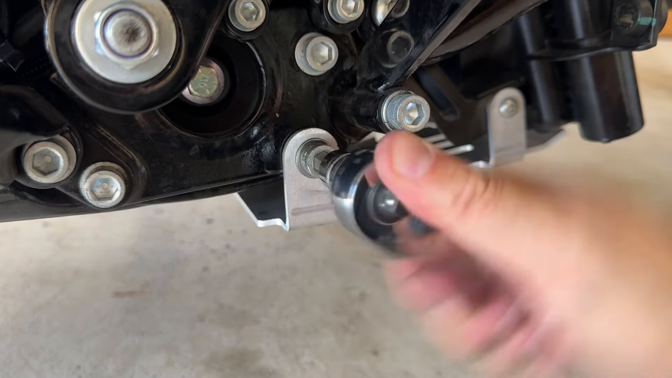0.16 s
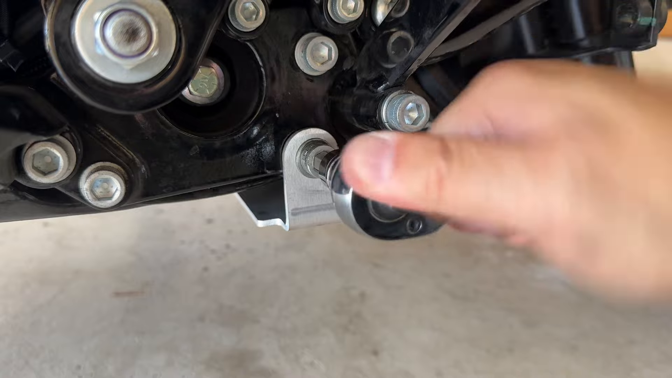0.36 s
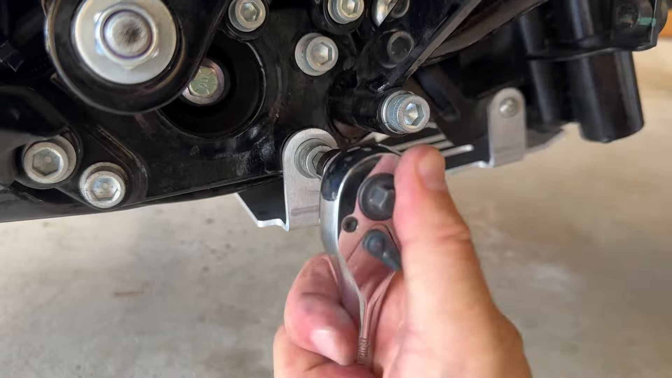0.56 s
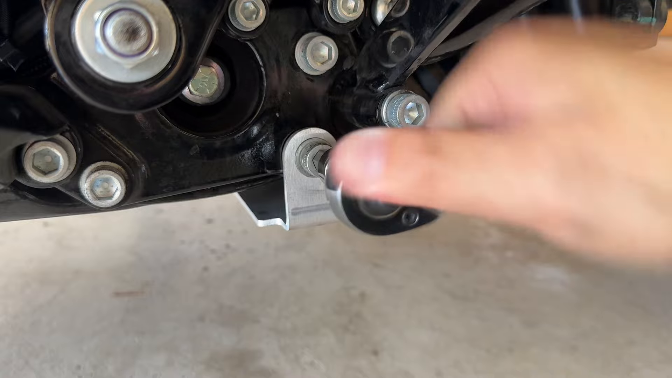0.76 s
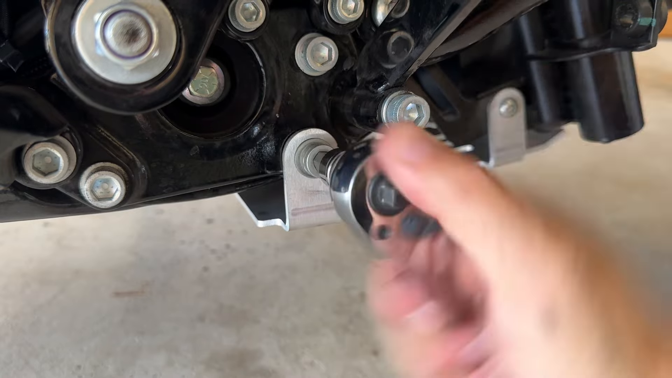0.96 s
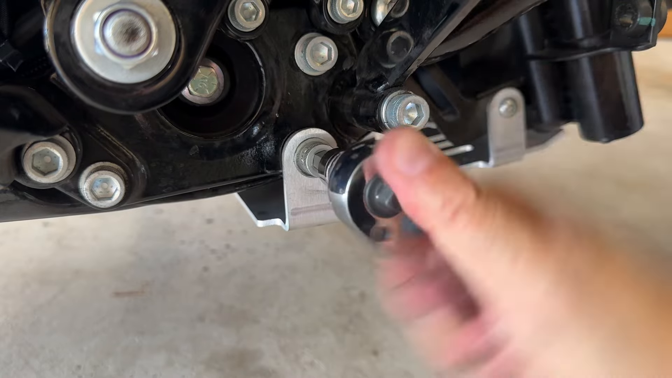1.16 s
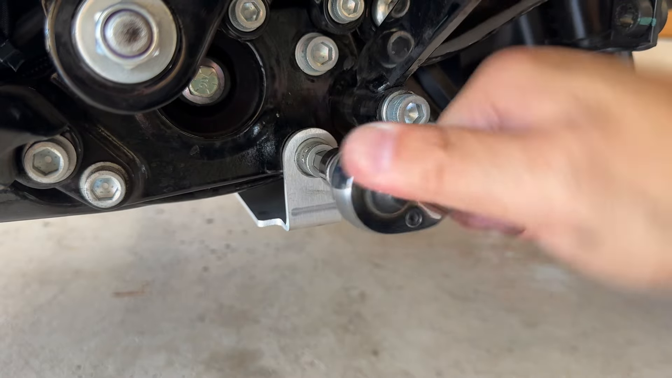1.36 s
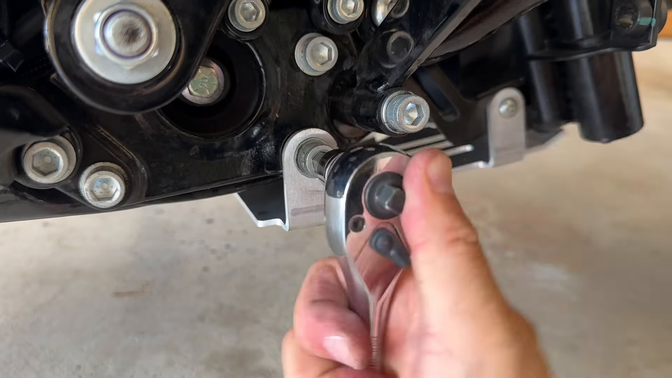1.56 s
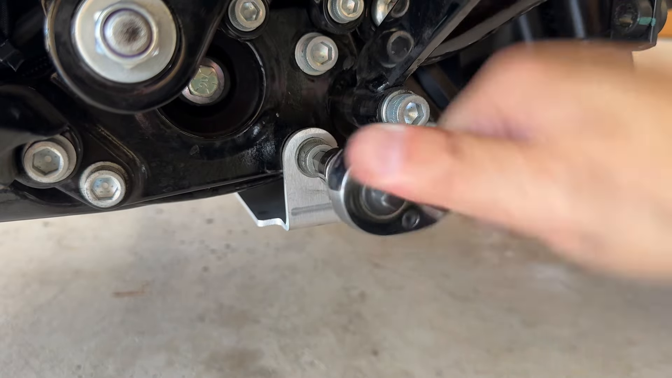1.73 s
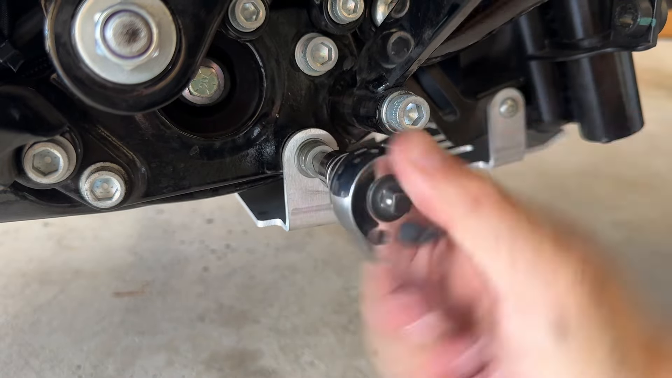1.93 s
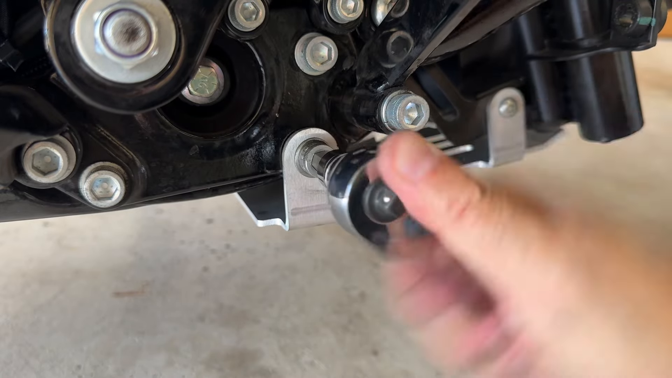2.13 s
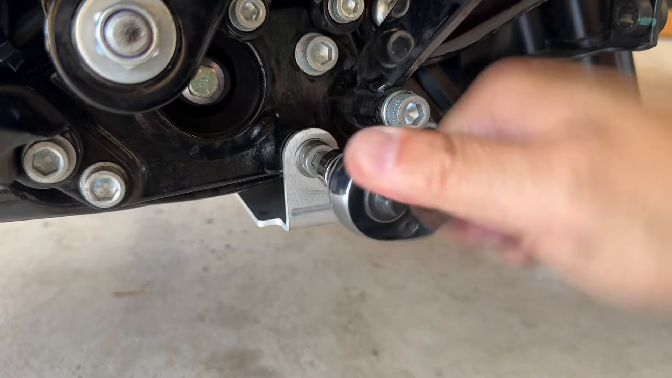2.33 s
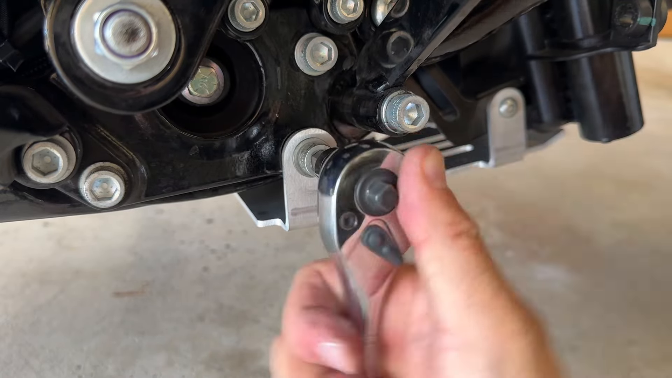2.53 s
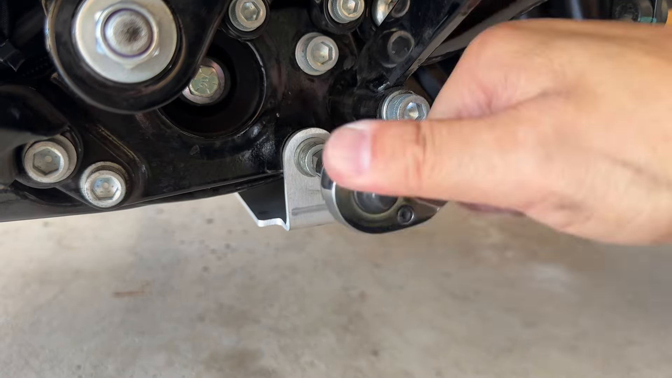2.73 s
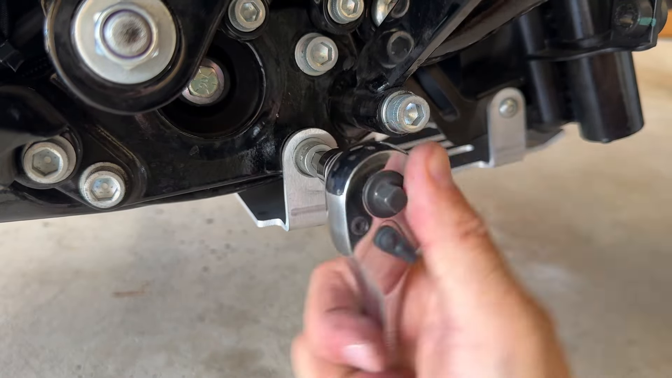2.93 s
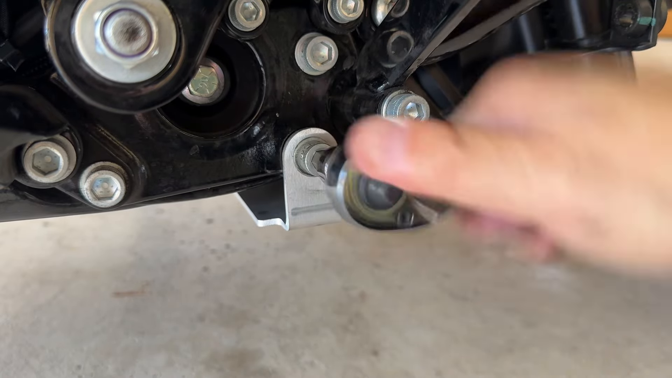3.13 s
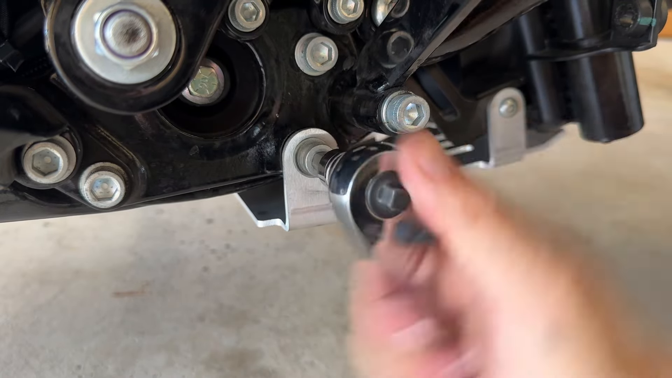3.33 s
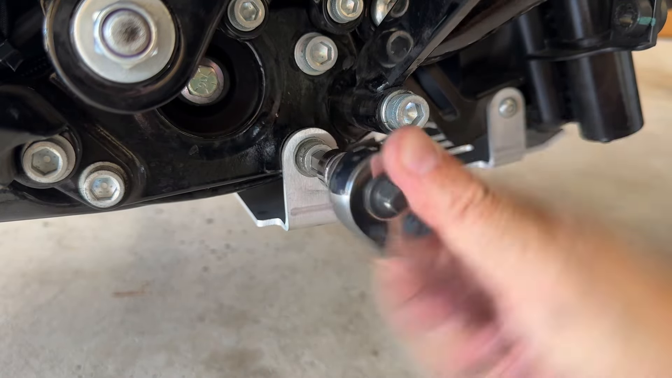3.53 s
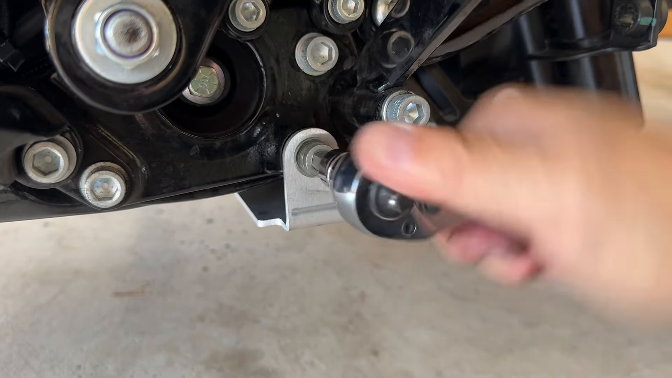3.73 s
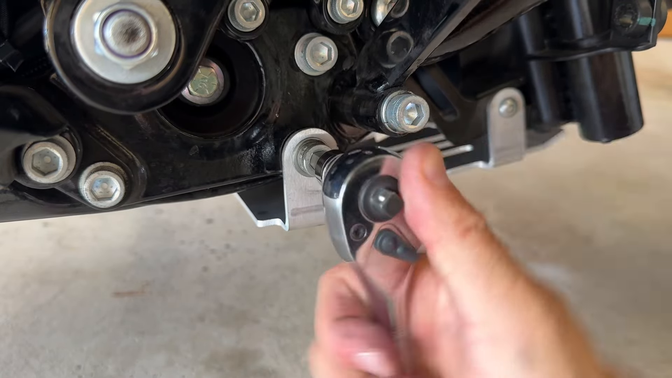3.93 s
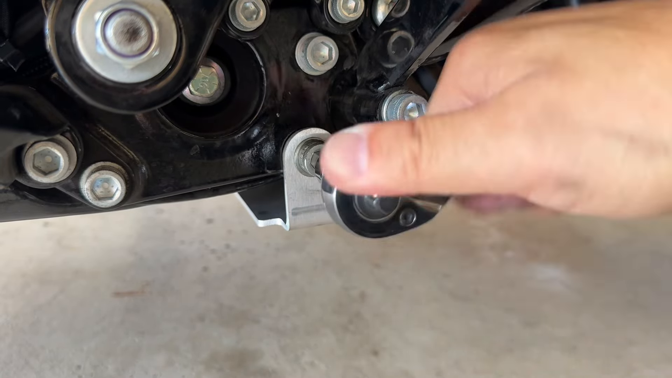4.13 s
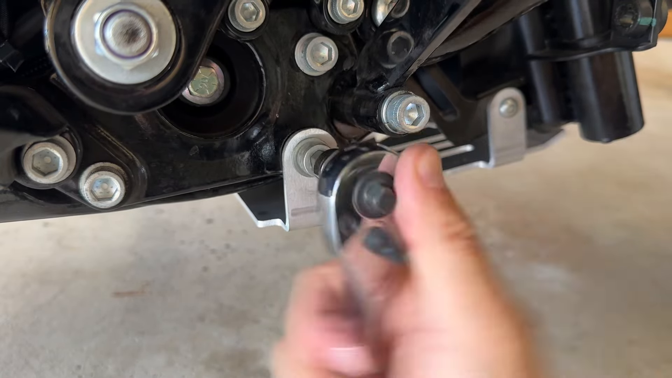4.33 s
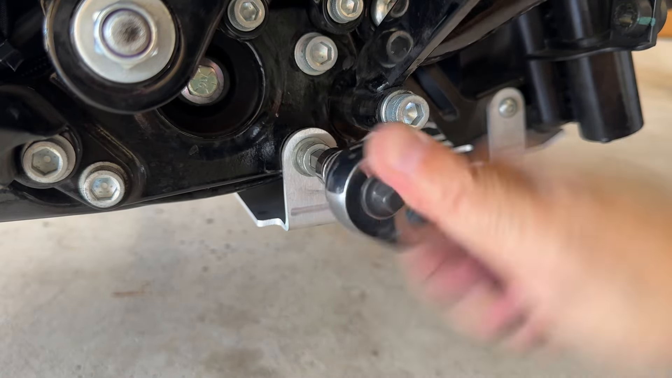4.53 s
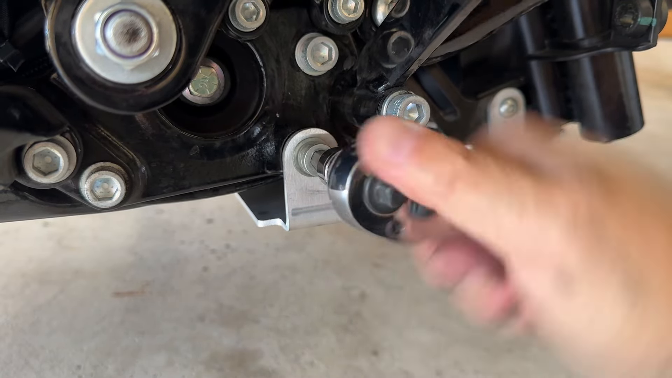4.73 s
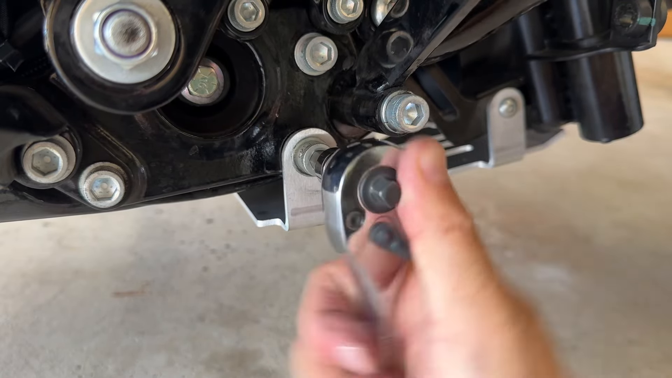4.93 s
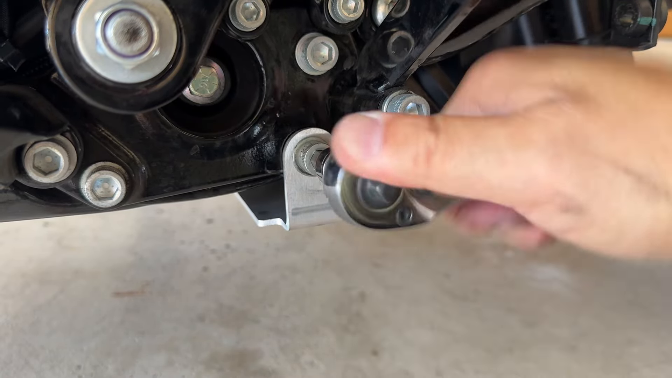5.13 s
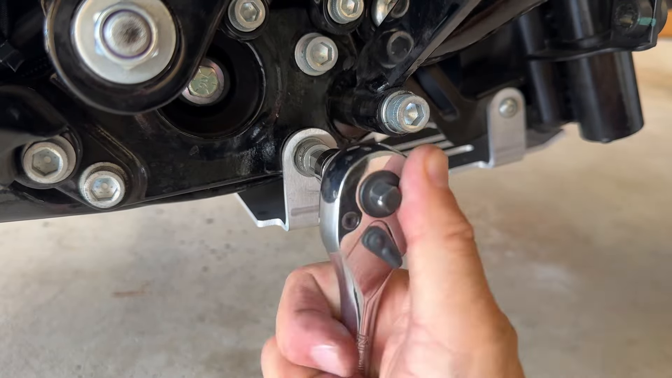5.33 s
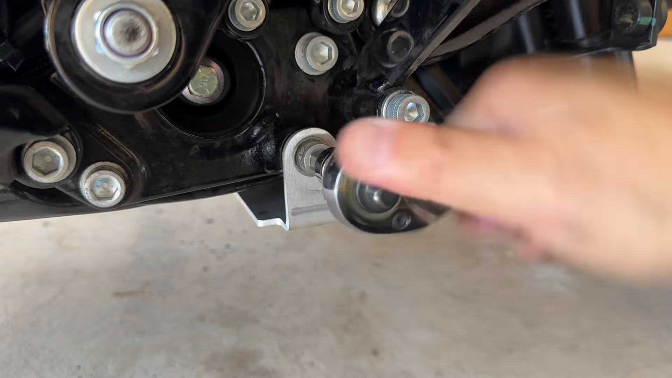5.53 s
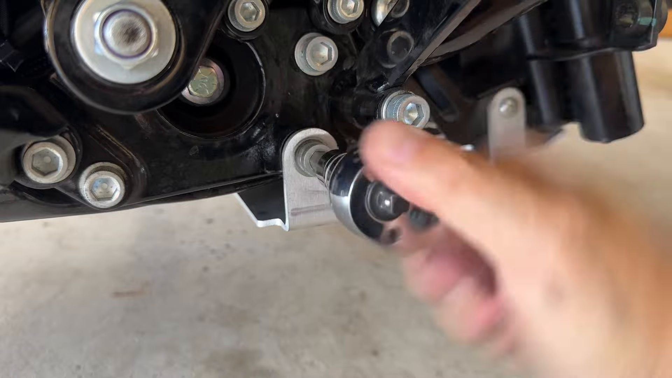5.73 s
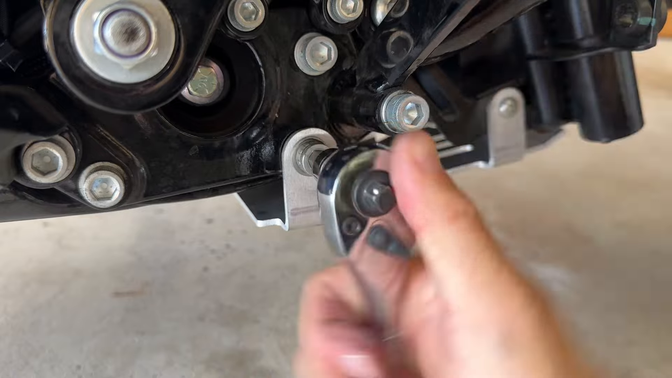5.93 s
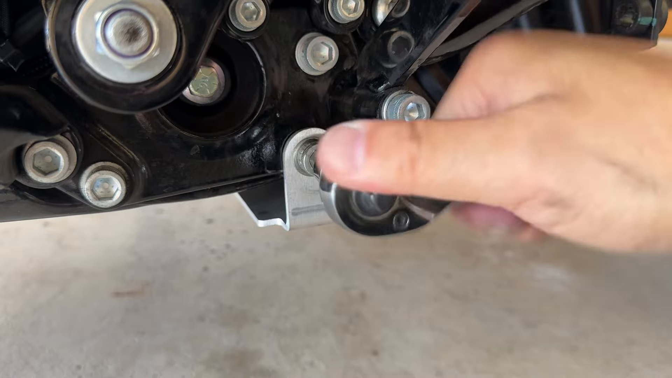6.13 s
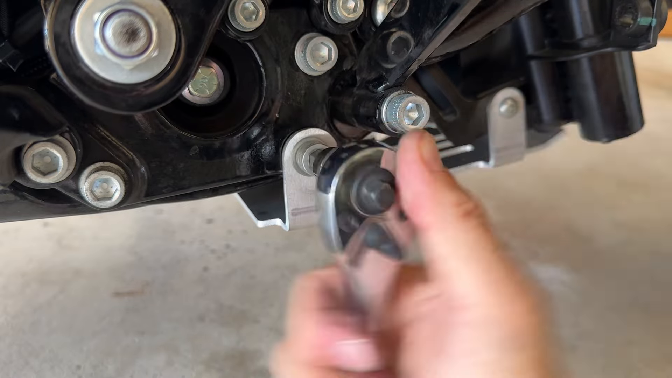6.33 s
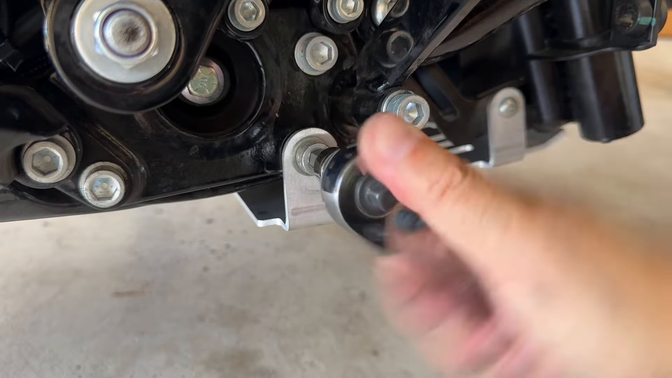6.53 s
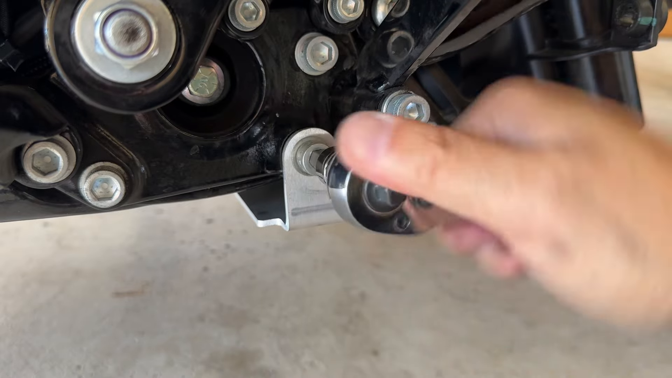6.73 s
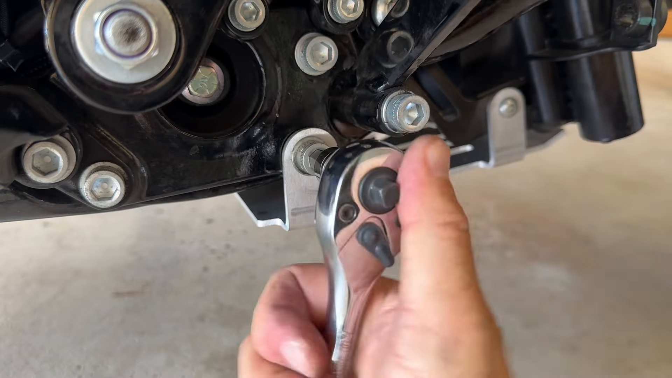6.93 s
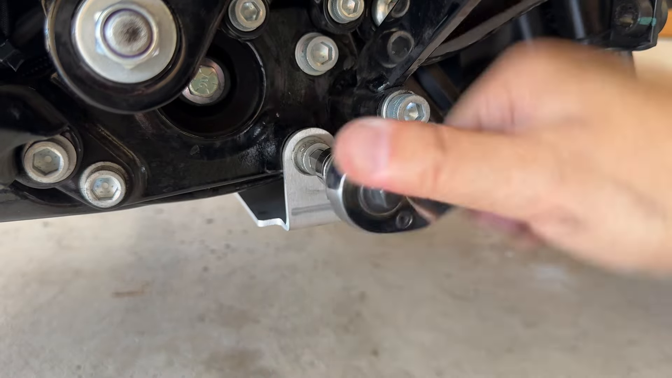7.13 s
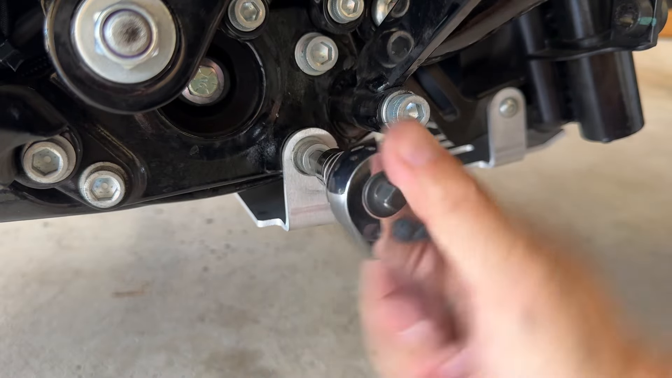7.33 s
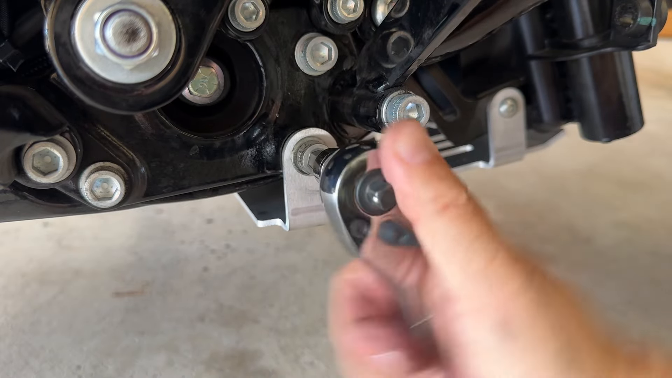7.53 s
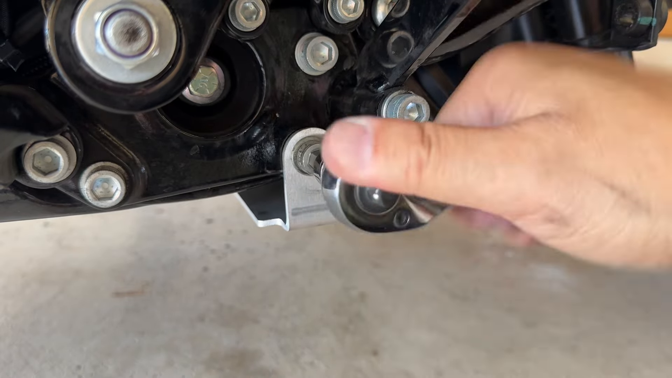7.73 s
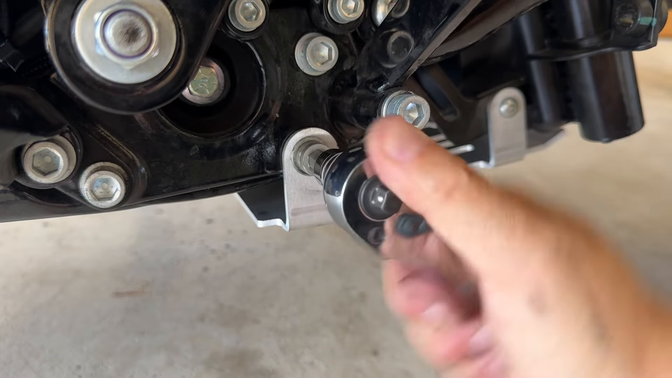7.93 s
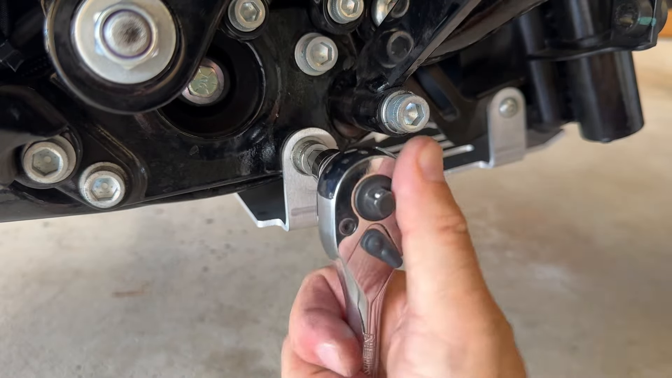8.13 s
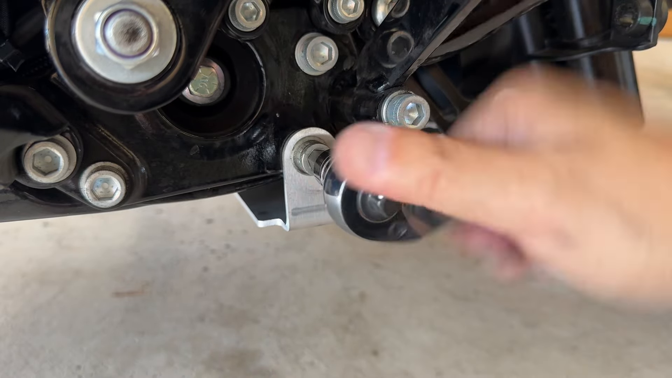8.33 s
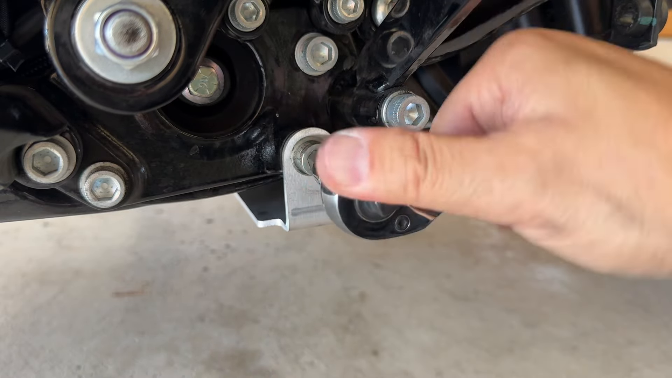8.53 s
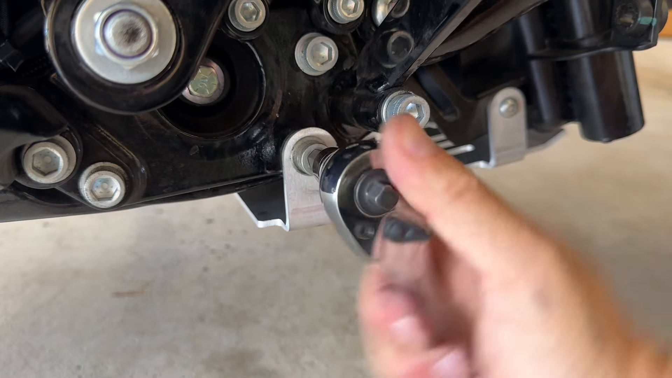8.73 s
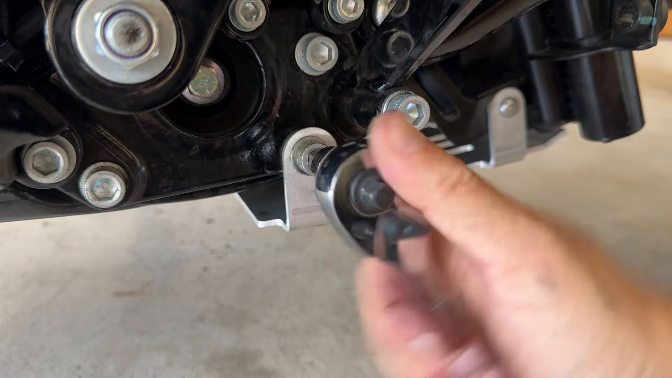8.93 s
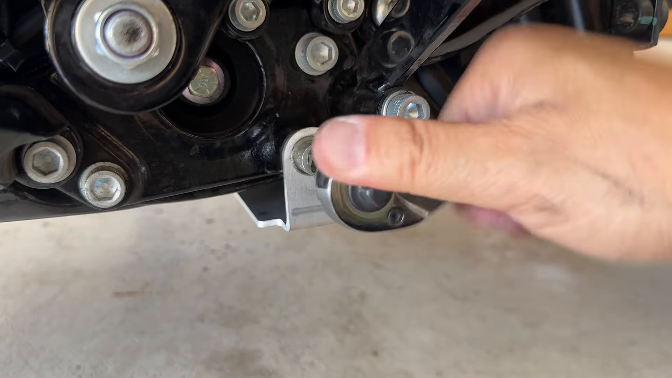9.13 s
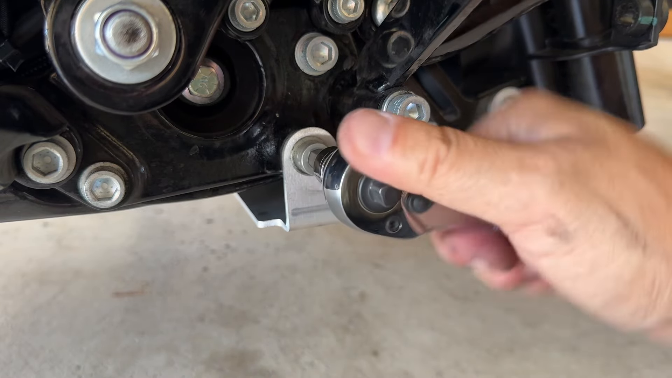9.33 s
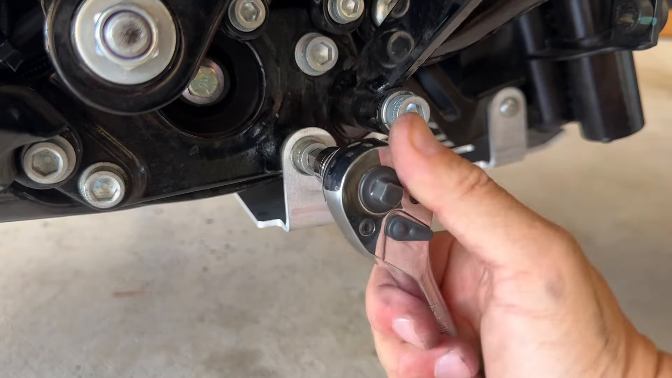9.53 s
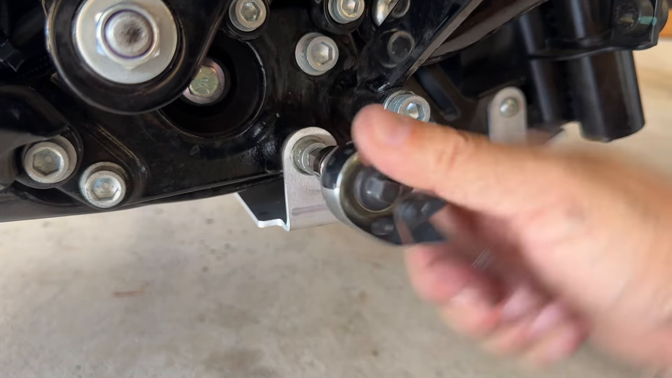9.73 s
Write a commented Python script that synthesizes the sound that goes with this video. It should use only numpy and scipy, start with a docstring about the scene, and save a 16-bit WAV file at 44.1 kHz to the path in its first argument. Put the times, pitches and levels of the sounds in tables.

```python
"""A socket ratchet runs a bolt into an engine case, close by in a garage.
On each back swing the pawl snaps over the teeth in a quick run that slows at the end. The loose socket
knocks on the bolt at the turns; pawl and socket catch under load. Each contact rings wrench and case
and reaches two microphones, directly and by reflection. The hand thuds softly; the room hums."""
import sys
import numpy as np
from scipy import signal
from scipy.fft import rfft, irfft, next_fast_len
from scipy.io import wavfile

SR = 44100
rng = np.random.default_rng(int(sys.argv[2]) if len(sys.argv) > 2 else 0)


def inscribe(sig):
    """Save sig as 16-bit PCM at rate SR to the path in sys.argv[1].

    A 1-D sig is mono; a 2-D sig holds one channel per row.
    Samples are clipped to [-1, 1] before scaling.
    """
    pcm = np.round(np.clip(np.atleast_2d(sig).T, -1, 1) * 32767)
    wavfile.write(sys.argv[1], SR, pcm.astype(np.int16))


N = 435266
TIME_S = np.arange(N) / SR

# room rumble: freq_hz, density_db
AIR_SPECTRUM = [(25, -26), (50, -8), (75, -0.5), (120, -4.5), (160, -10.5), (220, -10), (330, -20.5),
                (680, -16.5), (900, -22.5), (1500, -20.5), (1900, -26.5), (2500, -30), (5000, -35),
                (7800, -40), (9500, -63.5), (12000, -61)]
# room rumble, left to right: freq_hz, coherence
AIR_COHERENCE = [(100, 0.91), (250, 0.85), (500, 0.022), (4000, 0.12)]
# contact force band-pass: numerator, denominator
CONTACT_FILTER = signal.butter(2, [100, 8600], "band", fs=SR)
# socket knocks as the handle turns back, plus a few faint ticks during the forward stroke: start_s, level_db,
# body_db, sparkle_db
SOCKET_KNOCKS = [(0.11, -39.5, 4, -22), (0.483, -49, 14.5, -3), (0.579, -28.5, 11.5, -1.5),
                 (2.035, -27, -1, 7.5), (2.511, -32.5, 1.5, 1.5), (2.867, -49, -3, -13),
                 (4.296, -53.5, 15, -23), (4.414, -36, 8, -18), (5.377, -40.5, 14, -8),
                 (6.406, -34.5, 0.5, 6), (6.432, -36, 6.5, -19.5), (7.497, -46.5, 2, 3),
                 (8.184, -44.5, 2, -5.5), (8.863, -41.5, -2, 0.5), (9.666, -50, 4, -17)]
# pawl and socket catch on the forward stroke: start_s, level_db, body_db, sparkle_db
LOAD_CATCHES = [(0.323, -40, 13, -3.5), (0.853, -28.5, 5.5, -6.5), (3.69, -37.5, 7.5, -16),
                (4.145, -36, 8.5, -6.5), (4.658, -26.5, 5.5, -10.5), (4.672, -25.5, -1, -13),
                (5.627, -37.5, 7, -18), (6.678, -29.5, 4, -11), (7.21, -37, 8, -9.5), (7.737, -29, 1, -18),
                (7.757, -39.5, 16, -9.5), (7.952, -40, 18.5, -15), (9.139, -31, 5, -12)]
# quick part of each back swing: start_s, end_s, level_db, fade_db, body_db, sparkle_db, note_db
BACK_SWINGS = [(0.132, 0.22, -29, -1, -2.5, -2, -10), (0.623, 0.773, -31, -0.5, 0, 5.5, 7),
               (1.12, 1.245, -31.5, -1.5, 0.5, 4, 12.5), (1.613, 1.716, -29, -3, 0, -3, -11),
               (2.087, 2.173, -31, 0, 1, -2.5, -4), (2.562, 2.681, -29, -3.5, -1, 0, 8.5),
               (3.024, 3.146, -30.5, 2.5, -0.5, -2.5, -2.5), (3.4799, 3.584, -29.5, -0.5, 1, -4.5, 0),
               (3.9618, 4.051, -29, -2.5, 0.5, -1.5, -8.5), (4.454, 4.574, -29.5, -1.5, 1, 1, 9),
               (4.944, 5.025, -31.5, 1.5, 0.5, 0, -2), (5.419, 5.524, -31, 0.5, 0.5, -3, 2),
               (5.941, 6.055, -31.5, 0, 1, -3, -21), (6.47, 6.593, -30, -4, 0.5, 2.5, 13.5),
               (6.984, 7.13, -30, 0.5, -1.5, -0.5, 1.5), (7.524, 7.643, -30, -1.5, -1.5, 1.5, 7),
               (8.218, 8.362, -30.5, 0.5, -1.5, 0.5, 9), (8.918, 9.044, -27, -6.5, -3, 1, 2),
               (9.696, 9.812, -30, -1, -3.5, 2.5, -5)]
# speed through a swing: swing_fraction, teeth_per_s
TOOTH_RATE = [(0, 95), (.25, 130), (.65, 128), (1, 100)]
# single pawl drops as the handle stops: start_s, level_db, body_db, sparkle_db
FINAL_TEETH = [(0.2299, -29.5, -2, -8), (0.2415, -27, -4, -1.5), (0.2584, -27, -4, -2),
               (0.784, -31, -1, 6.5), (0.789, -33, -1, 10.5), (1.2615, -24, -8, 1.5),
               (1.7282, -26.5, -1, -2.5), (1.7405, -35.5, -2, 5), (1.757, -27, -3, 0), (2.1888, -29, -2, 3),
               (2.1995, -27, -6, 3), (2.2102, -39, -5, 9), (2.234, -26.5, -3, -2.5),
               (2.6928, -29.5, -2, -1.5), (2.699, -32.5, -8, 4.5), (2.722, -24, -2, 5),
               (3.1563, -23.5, -1.5, -2), (3.5957, -40, -3, 2), (3.6067, -34, -6, 2), (3.6188, -33, 1, 5),
               (4.0638, -29, -8, -3), (4.0729, -28, -4, -3.5), (4.0888, -32.5, 4, 2), (4.5856, -31, -2, 11),
               (4.6018, -32.5, -5, 4), (5.0409, -29, 0, -3), (5.0594, -26.5, -1.5, -6), (5.07, -31, -3, 1),
               (5.102, -28.5, 4.5, -4.5), (5.5381, -27.5, -4, 0.5), (5.549, -37, -2, 8),
               (5.568, -27, -4, -7), (6.0676, -30.5, -10, 5), (6.091, -29, -3, 3), (6.6068, -29, -2.5, 0.5),
               (6.622, -30.5, -10, 4.5), (7.1442, -30.5, -6, 10.5), (7.1647, -26.5, -6, 4.5),
               (7.6542, -26.5, -6.5, -4), (7.6753, -30.5, -4, 1.5), (7.72, -32, -9, 2.5),
               (8.3792, -29.5, -2.5, 5), (8.41, -23.5, -5, 2.5), (9.057, -25.5, -7, -2),
               (9.0805, -27.5, -3, 0), (9.8299, -30.5, -6, 7), (9.838, -26, -7, 2)]
# wrench, socket and case resonances: pitch_hz, t60_s, over_snap_db
STEEL_MODES = [(1611.1, 0.051, 1.5), (2296, 0.14, -6), (2470, 0.82, 3), (3210, 0.2, -2), (3325, 0.38, 3),
               (3470, 0.81, 5.5), (3700, 0.32, 1), (3765, 0.27, -6), (3920, 0.3, 5.5), (4040, 0.14, -5),
               (4295, 0.12, 8), (4880, 0.02, -15), (5610, 0.073, -10.5), (6180, 0.1, 1.5),
               (8000, 0.04, -17), (9270, 0.07, -18), (9940, 0.073, 3.5), (10535, 0.12, -15),
               (11320, 0.028, 16), (10900, 0.088, 4)]
# steel-on-steel snap: freq_hz, gain_db
SNAP_SPECTRUM = [(150, -31), (450, -12.5), (800, -12.5), (1200, -3.5), (2000, -6), (2450, 0), (2900, -5.5),
                 (3600, 1), (5000, 2.5), (6000, -1.5), (7500, 4.5), (8600, 8.5), (9300, 4), (9900, 11),
                 (10600, 8.5), (11600, 0)]
# direct path; lows go mostly via engine and floor: freq_hz, gain_db
DIRECT_PATH = [(500, -4), (1500, -10.5), (3500, -7.5), (6000, -9.5), (9500, -1)]
# microphone pair: freq_hz, left_lead_rad, reflection_coherence, left_over_right_db
MIC_PAIR = [(198.4, 0, 1, 1.5), (650, 1, 0.4, 4.5), (970, 0, 0.5, 4), (2000, -0.7, 0.7, 3.2),
            (2660, 1.44, 1, 0), (2900, 0, 0, 2.5), (3860.4, 3, 0.3, 1), (4990, -0.17, 0.5, 7),
            (5800, -1.2, 0, 1.5), (6690, 2.03, 0, 7.5), (7810, 3.5, 1, 0), (9070, 3.5, 1, -2),
            (9530, 2, 0.83, 1.5), (11370, 3, 0.8, -0.5)]
# room decay: freq_hz, t60_s
ROOM_DECAY = [(300, 1), (1500, 0.42), (4000, 0.19), (7000, 0.21), (11000, 0.15)]
# hand brakes or pushes the handle: peak_s, level_db
HAND_THUDS = [(0.35, -44), (0.742, -41), (0.87, -45.5), (1.72, -45.5), (2.216, -41.5), (2.33, -48.5),
              (2.687, -42.5), (2.82, -58), (3.609, -41.5), (3.71, -45.5), (4.093, -39), (4.2, -43.5),
              (4.709, -42), (5.06, -45), (5.17, -44), (5.53, -42.5), (5.668, -44.5), (6.06, -47),
              (6.183, -41.5), (6.72, -43.5), (7.8, -42.5), (8.52, -43), (9.165, -40.5), (9.205, -44.5)]
# deep bumps at the microphone: peak_s, level_db, sigma_s
DEEP_BUMPS = [(0.896, -44, 0.017), (3.976, -33, 0.015), (4.076, -42, .02), (4.354, -47, .02),
              (5.003, -28.5, 0.016), (5.092, -36, 0.025), (5.17, -35.5, 0.023)]


def from_db(db):
    """Decibels to gain."""
    return 10 ** (np.asarray(db) / 20)


def unit_rms(x):
    """Scale to unit rms."""
    return x / np.sqrt(np.mean(x ** 2) + 1e-20)


def at_hz(table, hz, column=1):
    """Interpolate a column over log frequency."""
    table = np.array(table)
    return np.interp(np.log(hz + 1e-9), np.log(table[:, 0]), table[:, column])


def band(x, low_hz, high_hz):
    """Gentle band-pass."""
    return signal.sosfilt(signal.butter(2, [low_hz, high_hz], "band", fs=SR, output="sos"), x + 1e-18)


def causal(gain_db):
    """Minimum-phase response: nothing sounds before the blow."""
    cepstrum = irfft(np.log(from_db(gain_db)))
    half = len(cepstrum) // 2
    cepstrum[1:half] *= 2
    cepstrum[half + 1:] = 0
    return np.exp(rfft(cepstrum))


def add(track, start_s, sound):
    """Mix a sound in at start_s."""
    start = max(int(start_s * SR), 0)
    part = sound[:max(N - start, 0)]
    track[start:start + len(part)] += part


def garage_air(air_db=-46, drift_db=5.0, hum_hz=99.9, hum_db=-50, waver=0.3):
    """Rumble with a drifting midrange, plus a wavering hum."""
    size = next_fast_len(N, real=True)
    hz = np.fft.rfftfreq(size, 1 / SR)
    mid, side = rfft(rng.standard_normal((2, size))) * from_db(at_hz(AIR_SPECTRUM, hz))
    coherence = at_hz(AIR_COHERENCE, hz)
    air = irfft(np.sqrt(1 + coherence) * mid + np.sqrt(1 - coherence) * side * [[1], [-1]], size)[:, :N]
    knots_s = np.arange(0, TIME_S[-1] + .15, .15)
    drift = np.interp(TIME_S, knots_s, from_db(drift_db * rng.standard_normal(len(knots_s))))
    air = air + band(air, 1100, 1800) * (drift - 1)
    hum = np.sqrt(2) * np.sin(2 * np.pi * hum_hz * TIME_S)
    hum += waver * unit_rms(band(rng.standard_normal(N), hum_hz - 5, hum_hz + 5))
    return from_db(air_db) * unit_rms(air) + from_db(hum_db) * hum


def contact(chatter_s, rebound_s, rebound_db):
    """Steel lands, chatters, lands again more softly; unit energy."""
    t = np.arange(SR // 60) / SR
    late_s = t - rebound_s * rng.uniform(.5, 1.5)
    rebound = from_db(rebound_db) * (late_s > 0) * np.exp(-abs(late_s) / chatter_s)
    envelope = np.exp(-t / chatter_s) + rebound
    force = signal.lfilter(*CONTACT_FILTER, envelope * rng.choice([-1, 1], len(t)))
    return force / np.linalg.norm(force)


def tint(force, body_db, sparkle_db, clatter_db=0):
    """Grip and angle dull or brighten a contact; a hurried one clatters in the upper mids."""
    size = 2 * next_fast_len(len(force))
    hz = np.fft.rfftfreq(size, 1 / SR)
    gain_db = at_hz([(2000, body_db), (4000, 0), (6000, 0), (9000, sparkle_db)], hz)
    gain_db += at_hz([(1600, 0), (2900, clatter_db), (3800, clatter_db), (5200, 0)], hz)
    return irfft(rfft(force, size) * causal(gain_db))[:len(force)]


def knocks(rows, gain_db, clatter_db=0):
    """Single steel contacts, each with its own colour."""
    out = np.zeros(N)
    for start_s, level_db, body_db, sparkle_db in rows:
        force = contact(chatter_s=0.00048, rebound_s=.0015, rebound_db=-14.0)
        add(out, start_s, from_db(level_db + gain_db) * tint(force, body_db, sparkle_db, clatter_db))
    return out


def socket(scuff_db=-41, scuff_s=0.024, tick_db=-50, body_db=14, sparkle_db=-5):
    """The loose socket knocks and catches; before each run it shifts on the bolt with a tick and scuff."""
    starts_s = [row[0] for row in BACK_SWINGS]
    ticks = [(s - scuff_s * rng.uniform(0.92, 1.7), tick_db, body_db, sparkle_db) for s in starts_s]
    out = knocks(SOCKET_KNOCKS + ticks, gain_db=24.5) + knocks(LOAD_CATCHES, gain_db=23.5)
    for start_s in starts_s:
        noise, roughness = rng.standard_normal((2, int(scuff_s * SR)))
        scuff = band(unit_rms(noise * np.exp(roughness)), 680, 2800)
        add(out, start_s - scuff_s, from_db(scuff_db) * scuff)
    return out


def pawl(gain_db=28.0, first_db=3.0, uneven_db=2.0, colour_db=2.0, slide_db=-33):
    """The pawl slides up each flank and snaps down; clatter falls as the handle slows."""
    out = np.zeros(N)
    for start_s, end_s, level_db, fade_db, body_db, sparkle_db, _ in BACK_SWINGS:
        progress = np.linspace(0, 1, int((end_s - start_s) * SR))
        teeth_per_s = np.interp(progress, *np.transpose(TOOTH_RATE))
        angle_teeth = np.cumsum(teeth_per_s) / SR
        teeth = np.linspace(0, angle_teeth[-1], round(angle_teeth[-1]) + 1)
        teeth[1:-1] += rng.normal(0, .09, len(teeth) - 2)
        places = np.interp(teeth, angle_teeth, progress)
        snaps_db = fade_db * places + uneven_db * rng.standard_normal(len(teeth))
        snaps_db[0] = first_db
        slide = from_db(slide_db) * unit_rms(teeth_per_s ** 2) * rng.standard_normal(len(progress))
        run = np.pad(slide, (0, SR // 30))
        for place, snap_db in zip(places, snaps_db):
            force = contact(chatter_s=0.00085, rebound_s=.002, rebound_db=-5.5)
            snap = tint(force, *rng.normal(0, colour_db, 2), clatter_db=2.5 - 4.0 * place ** 2)
            add(run, place * (end_s - start_s), from_db(snap_db) * snap)
        add(out, start_s, from_db(level_db + gain_db) * tint(run, body_db, sparkle_db))
    return out + knocks(FINAL_TEETH, gain_db=27.5, clatter_db=-4)


def mode(force, pitch_hz, t60_s, gain_db, wander_db=2.5, wander_widths=0.15):
    """One resonance wandering with the grip; more damping, more pitch drift."""
    knots_s = np.arange(0, TIME_S[-1] + .06, .06)
    pole = from_db(-60 / (t60_s * SR))
    width_hz = np.log(1000) / (np.pi * t60_s)
    gain_drift, pitch_drift = rng.standard_normal((2, len(knots_s)))
    gain = np.interp(TIME_S, knots_s, from_db(gain_db + wander_db * gain_drift))
    hz = np.interp(TIME_S, knots_s, pitch_hz + wander_widths * width_hz * pitch_drift)
    carrier = np.exp(2j * np.pi * np.cumsum(hz) / SR)
    envelope = signal.lfilter([1 - pole], [1, -pole], force * gain * carrier.conj() + 1e-18)
    return 2 * np.real(carrier * envelope)


def ringing(force, modes_db=1.5, skim_db=-18, free_db=7.5, knock_db=-5, settle_s=.06):
    """Wrench and case ring; the pawl's own note emerges as the swing slows and it drops full depth."""
    drive_db = []
    for start_s, end_s, *_, note_db in BACK_SWINGS:
        drive_db += [(start_s - settle_s, knock_db), (start_s, note_db + skim_db),
                     ((start_s + end_s) / 2, note_db + skim_db / 3),
                     (end_s, note_db + free_db), (end_s + settle_s, knock_db)]
    pawl_force = force * from_db(np.interp(TIME_S, *np.transpose(drive_db)))
    body = from_db(modes_db) * sum(mode(force, *row) for row in STEEL_MODES)
    return body + mode(pawl_force, pitch_hz=4946, t60_s=0.074, gain_db=2.5)


def scatter(sound, decay_s=0.0073, delay_s=.0008):
    """Quick reflections off engine, hand and floor; paths change as the handle moves."""
    out, hop = np.zeros(N), SR // 20
    t = np.arange(hop) / SR
    window = np.hanning(2 * hop)
    for start in range(0, N, hop):
        piece = sound[start:start + 2 * hop]
        paths = rng.standard_normal(hop) * np.exp(-t / decay_s) * (t > delay_s)
        paths /= np.linalg.norm(paths)
        add(out, start / SR, signal.fftconvolve(piece * window[:len(piece)], paths))
    return out


def garage_reverb(sound, build_s=0.0014):
    """Room tail; treble dies sooner."""
    t = np.arange(SR) / SR
    white, hz = rfft(rng.standard_normal(SR)), np.arange(SR // 2 + 1)
    edges_hz = [0, 700, 1400, 2800, 5000, 8000, SR // 2 + 1]
    tail = np.zeros(SR)
    for low_hz, high_hz in zip(edges_hz, edges_hz[1:]):
        t60_s = at_hz(ROOM_DECAY, (low_hz + high_hz) / 2)
        tail += irfft(white * (hz >= low_hz) * (hz < high_hz)) * from_db(-60 * t / t60_s)
    tail *= 1 - np.exp(-t / build_s)
    return signal.fftconvolve(sound, tail / np.linalg.norm(tail))[:N]


def radiate(force, room_db=-7):
    """Snap and ring reach two microphones, directly and by reflection."""
    size = 2 * next_fast_len(N // 2 + SR // 4, real=True)
    hz = np.fft.rfftfreq(size, 1 / SR)
    steel = force + ringing(force)
    lead_rad, coherence, balance_db = [at_hz(MIC_PAIR, hz, column) for column in (1, 2, 3)]
    direct = rfft(steel, size) * causal(at_hz(DIRECT_PATH, hz))
    reflections = [scatter(steel) + from_db(room_db) * garage_reverb(steel) for _ in range(2)]
    shared, right_only = rfft(reflections, size)
    left = (direct + shared) * from_db(balance_db / 2)
    right = direct + coherence * shared + np.sqrt(1 - coherence ** 2) * right_only
    right *= from_db(-balance_db / 2) * np.exp(-1j * lead_rad)
    return irfft(causal(at_hz(SNAP_SPECTRUM, hz)) * np.array([left, right]))[:, :N]


def swell(noise, peak_s, sigma_s):
    """Gaussian noise burst, unit rms at its top."""
    bell = np.exp(-.5 * np.minimum(((TIME_S - peak_s) / sigma_s) ** 2, 100))
    return bell * noise * np.linalg.norm(bell) / np.linalg.norm(bell * noise)


def hand(thud_sigma_s=0.021):
    """Dull thuds of the hand on the handle; a few deep bumps."""
    dull = band(rng.standard_normal(N), 134, 222)
    deep = band(rng.standard_normal(N), 44, 95)
    thuds = sum(from_db(db) * swell(dull, peak_s, thud_sigma_s) for peak_s, db in HAND_THUDS)
    bumps = sum(from_db(db) * swell(deep, peak_s, sigma_s) for peak_s, db, sigma_s in DEEP_BUMPS)
    return thuds + bumps


def scene():
    """Wrench, hand and room; stereo."""
    return radiate(pawl() + socket()) + hand() + garage_air()


def record(dry):
    """Soft peak limit, steep low-pass."""
    ceiling, cutoff_hz = .6, 11880
    limited = dry / (1 + (dry / ceiling) ** 6) ** (1 / 6)
    return signal.sosfilt(signal.ellip(8, .3, 70, cutoff_hz, fs=SR, output="sos"), limited)


dry = scene()
out = record(dry)
inscribe(out)
```